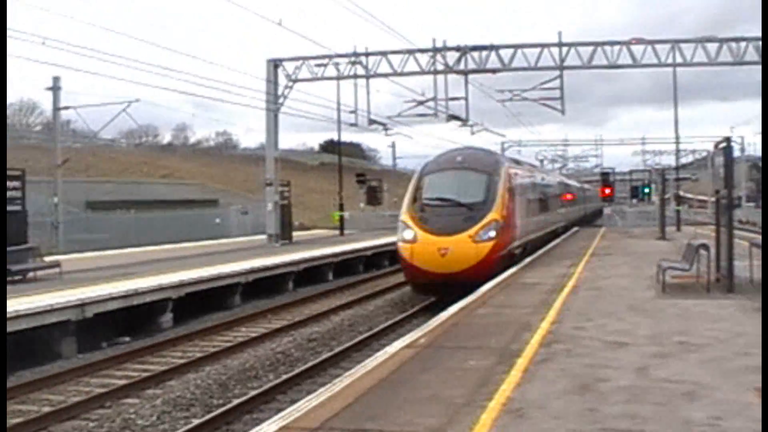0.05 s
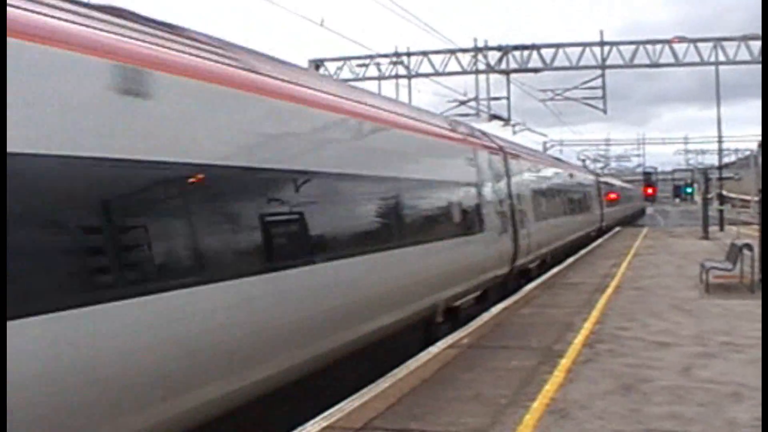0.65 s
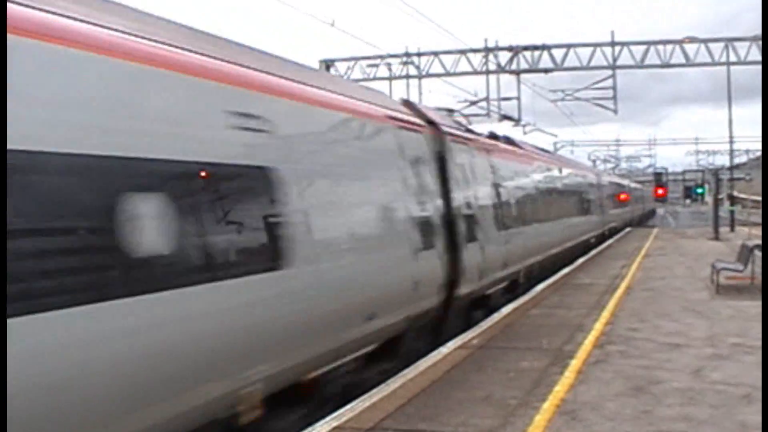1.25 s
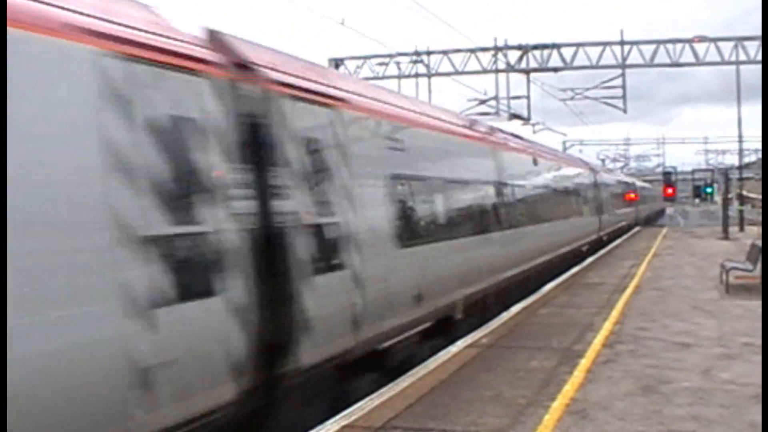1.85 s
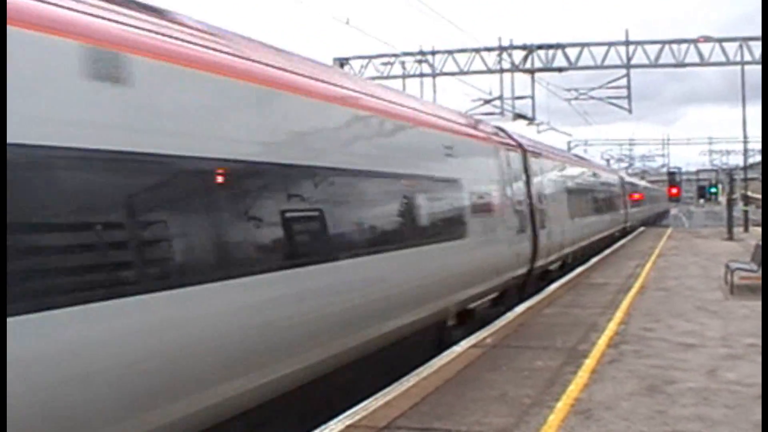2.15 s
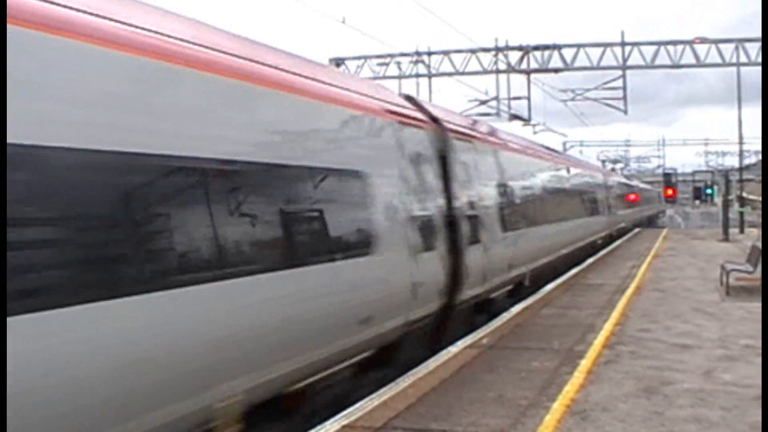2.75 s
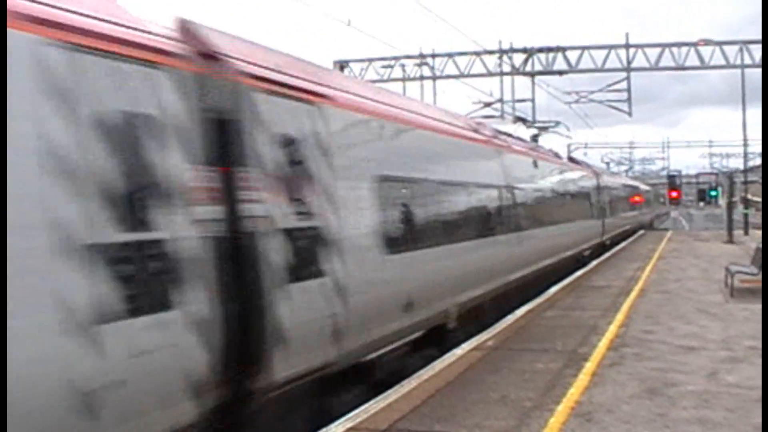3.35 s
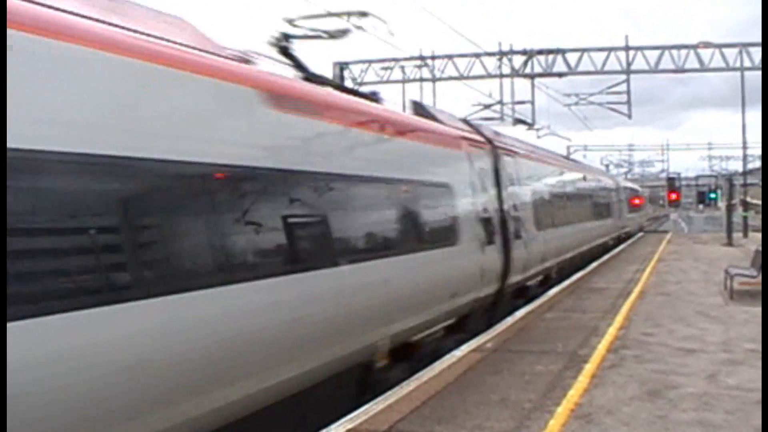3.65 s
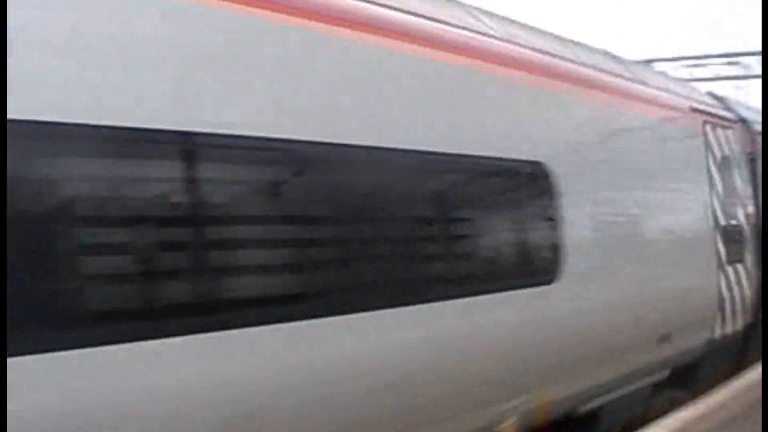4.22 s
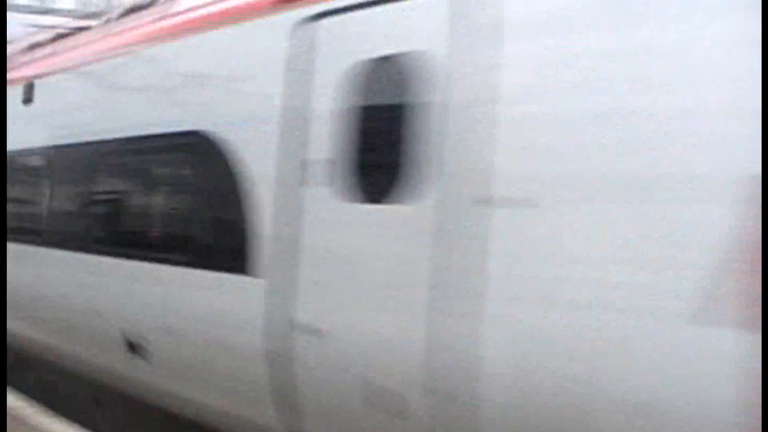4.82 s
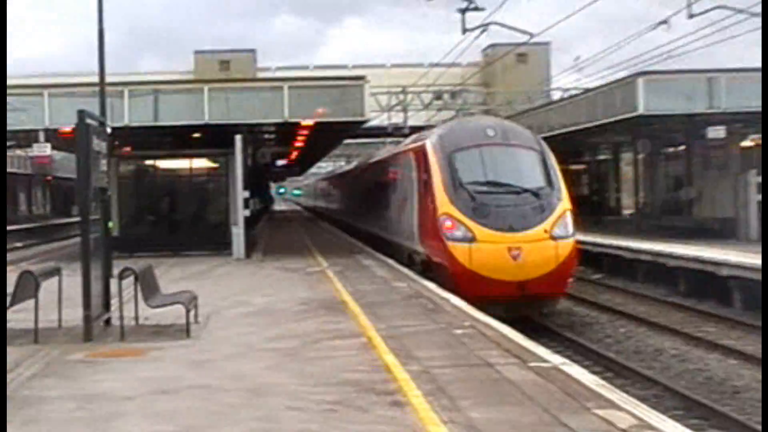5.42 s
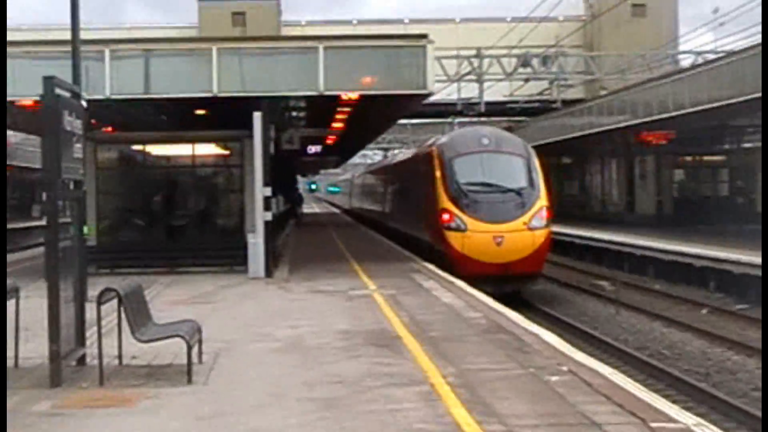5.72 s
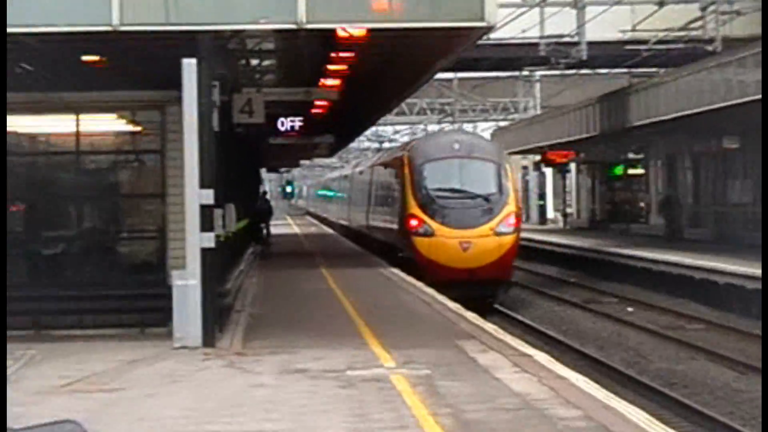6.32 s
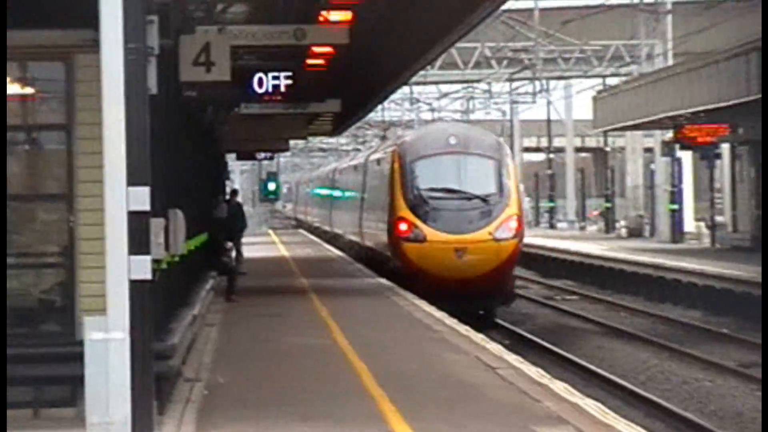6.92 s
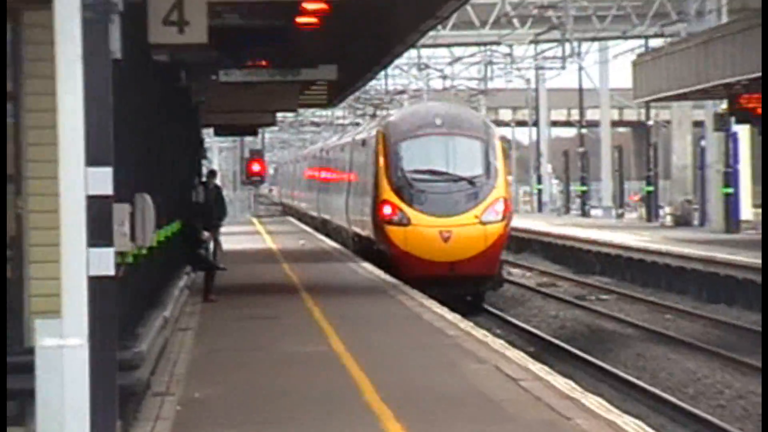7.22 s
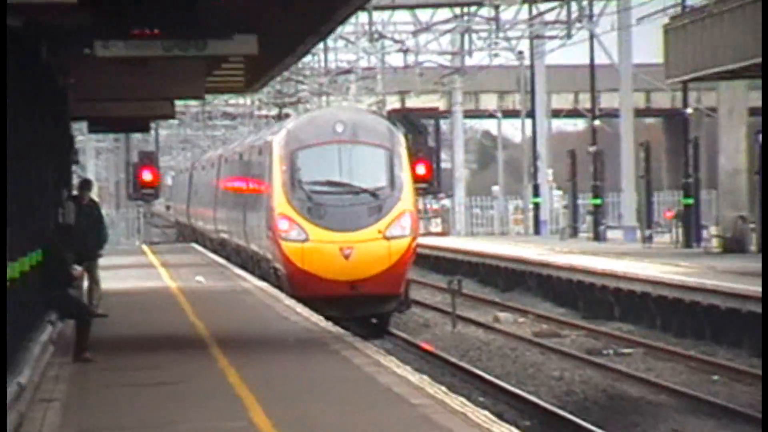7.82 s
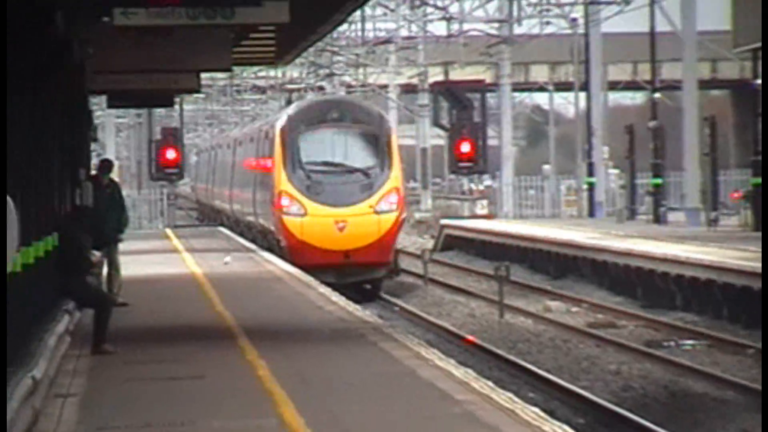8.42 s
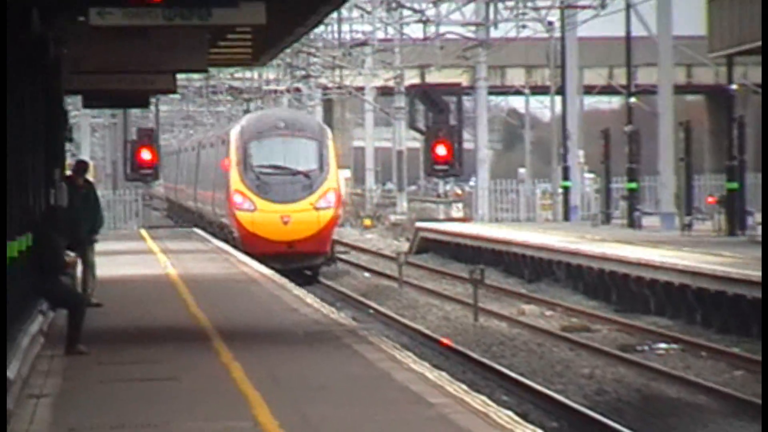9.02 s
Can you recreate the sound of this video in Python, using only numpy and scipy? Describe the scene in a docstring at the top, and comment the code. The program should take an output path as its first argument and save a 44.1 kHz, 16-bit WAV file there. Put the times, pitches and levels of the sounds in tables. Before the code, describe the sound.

Heard close from a station platform, a fast electric train arrives with a short drone and ringing rails. Carriage after carriage rushes past, steel wheels ringing and dropping in pitch amid a loud roar, pulsing hiss and dragged air. Once the tail has passed, the sound turns hollow beneath the platform roof and fades to distant wheel tones, with a few low gusts buffeting the microphone.

```python
"""A low drone and singing rails come first, then a nine-car electric train runs through the station at
speed, about four metres from a stereo microphone on the platform. Each bogie sweeps by with ringing steel
wheels whose pitch drops as they pass, over the roar of the rails and the rush of dragged air.
The train recedes under the canopy, which channels its sound back, while its wake buffets the microphone."""
import sys
import numpy as np
from scipy import signal
from scipy.fft import rfft, irfft, next_fast_len
from scipy.io import wavfile
from scipy.ndimage import map_coordinates

SR = 44100
rng = np.random.default_rng(int(sys.argv[2]) if len(sys.argv) > 2 else 0)


def dump(signal):
    """Clip the signal to [-1, 1] and save it as 16-bit WAV at the path in sys.argv[1]."""
    limited = np.clip(np.atleast_2d(signal).T, -1, 1)
    pcm = np.round(limited * 32767).astype(np.int16)
    wavfile.write(sys.argv[1], SR, pcm)


N = 404397


def amp(db):
    """Decibels to gain."""
    return 10 ** (np.asarray(db) / 20)

def unit(x):
    """Scale to rms 1."""
    return x / np.sqrt(np.mean(x ** 2) + 1e-20)

def clock():
    """The time of each sample in seconds."""
    return np.arange(N) / SR

def around(s, half_length):
    """The samples within half_length seconds of time s."""
    return slice(max(0, int((s - half_length) * SR)), int((s + half_length) * SR))

def along(points, hz):
    """(frequency, value) points read on a log axis."""
    f, v = np.transpose(points)
    return np.interp(np.log(hz + 1), np.log(f + 1), v)

def read_at(x, positions):
    """x at fractional sample positions; their pace bends the pitch."""
    return map_coordinates(x, [positions], prefilter=False, mode="mirror")

def wobble(rate):
    """A smooth random curve, rate knots a second."""
    coarse = np.arange(0, N + 64, 64) / SR
    knots = rng.standard_normal(4096)
    return np.interp(clock(), coarse, map_coordinates(knots, [coarse * rate], mode="mirror"))

def filtered(x, response):
    """x through a filter given as a function of frequency."""
    size = next_fast_len(N + 8192)
    return irfft(rfft(x, size) * response(np.fft.rfftfreq(size, 1 / SR)), size)[..., :N]

def noise_pair(spectrum):
    """Two noises of one colour: row 0 is shared by both microphone ports, row 1 sets them apart."""
    return unit(filtered(rng.standard_normal((2, N)), lambda hz: amp(along(spectrum, hz))))

def ringing(modes):
    """Resonances kept going by noise, as steel is by a rough rail."""
    def power(hz):
        return sum(amp(db) ** 2 / (1 + ((hz - f) / width) ** 2) ** 2 for f, width, db in modes)
    return unit(filtered(rng.standard_normal(N), lambda hz: np.sqrt(power(hz))))

def steady_ring(hz, width_hz, evenness=.27):
    """One resonance driven without a break: its chance swells and lulls are partly evened out."""
    ring = ringing([(hz, width_hz, 0)])
    envelope = np.hypot(ring, filtered(ring, lambda f: 1j))
    return unit(ring / (envelope + 1e-3) ** evenness)

def swell(s, length):
    """A bell-shaped rise and fall around time s."""
    return 1 / np.cosh(np.clip((clock() - s) / length, -20, 20)) ** 1.76

def sweep(s, before, after, rise, fall):
    """Power of something passing: half at s - before and s + after, with sides as steep as rise, fall."""
    t = clock() - s
    return 1 / (1 + np.where(t < 0, -t / before, t / after) ** np.where(t < 0, rise, fall))

def onset(s, length):
    """A smooth step from 0 to 1 around time s."""
    return (1 + np.tanh((clock() - s) / length)) / 2

def gone():
    """Share of the sound that reaches the microphone from behind the tail, 0 to 1."""
    return onset(5.21, .093)

def receded(canopy_end_s=6.87, fade_s=1.48):
    """How far the departing train has faded: 0 under the canopy, 1 far beyond it."""
    return np.clip((clock() - canopy_end_s) / fade_s, 0, 1)

def roof_lift():
    """A last swell in dB as the tail nears the end of the roof."""
    return 1.5 * swell(6.83, .075)


# The train far beyond the canopy: (frequency [Hz], width [Hz], relative level [dB])
DISTANT_MODES = [(160, 60, 0), (880, 110, -5.5), (1037, 100, -0.5), (1190, 75, -2), (1510, 20, -10),
                 (1960, 10, -9), (2010, 45, 0.5), (2460, 18, -11)]

def distant_howl(db=-36):
    """A thin howl is left once the tail is far down the line."""
    return amp(db) * onset(7.66, .15) * ringing(DISTANT_MODES)

def lingering_tone(db=-41):
    """A low wheel tone carries back to the platform as the rest fades."""
    return amp(db) * np.sqrt(sweep(7.85, .47, .47, 4.7, 14)) * steady_ring(hz=704, width_hz=20)

# Roar and hiss from far along the platform: (frequency [Hz], relative level [dB])
FAR_ROAR_SPECTRUM = [(800, -54), (1350, -7), (1620, -11.5), (1800, -1), (2050, 1.5), (2600, 2), (2900, -2),
                     (3500, -2.5), (4200, -11.5), (5500, -29.5), (9000, -72)]
FAR_HISS_SPECTRUM = [(2500, -20), (4000, 1.5), (5000, -2), (6300, -9), (8000, -25), (10300, -45),
                     (11600, -28.5), (13000, -37), (15600, -44)]
# Wheels heard from behind, lowered in pitch: (frequency [Hz], width [Hz], relative level [dB])
RECEDING_MODES = [(630, 40, -5), (705, 7, 0), (790, 60, -3), (910, 20, -7), (1552, 19, 1.5), (1922, 11, 3),
                  (2040, 60, -1.5), (2525, 30, -6)]

def canopy(roar_db=-24.5, hiss_db=-38.5, ring_db=-27.5):
    """The roof channels the departing roar and wheel tones to the microphone; the hiss fades fastest."""
    roar_gain = amp(roar_db + roof_lift() - 9.5 * receded() + .18 * wobble(24))
    out = roar_gain * noise_pair(FAR_ROAR_SPECTRUM)
    out += amp(hiss_db - 16 * receded() + .96 * wobble(15)) * noise_pair(FAR_HISS_SPECTRUM)
    # each tone swells and sinks by itself as the reflections shift
    tones = sum(amp(db + .8 * wobble(7)) * np.sqrt(width) * steady_ring(hz, width)
                for hz, width, db in RECEDING_MODES)
    audible = onset(4.5, .27) * (1 - onset(8.57, .27))
    out[0] += amp(ring_db + roof_lift() - 8 * receded()) * audible * unit(tones)
    return np.sqrt(gone()) * out

# The front of the train, heard from up the line: (frequency [Hz], width [Hz], relative level [dB])
NOSE_MODES = [(167, 28, -6), (200, 31, -3), (245, 23, -4), (550, 69, -12), (773, 110, -8.5),
              (1060, 110, -10.5), (1260, 180, -16), (1870, 250, -10.5)]

def nose_drone(db=-24.5):
    """The nose drones ahead of itself until it draws level with the microphone."""
    return amp(db) * np.sqrt(sweep(.48, .69, .22, 1.4, 7)) * ringing(NOSE_MODES)

# The rails below the platform, ahead of the nose: (frequency [Hz], width [Hz], relative level [dB])
RAIL_MODES = [(1965, 35, -6), (2510, 80, 0)]

def singing_rails(db=-29.5):
    """The rails carry the ring of the first wheels ahead, wavering and building until the nose arrives."""
    drift = np.cumsum(.02 * wobble(22))
    flicker_db = 2.5 * wobble(25)
    ring = read_at(ringing(RAIL_MODES), np.arange(N) + drift)
    return amp(db + flicker_db) * np.sqrt(sweep(.53, .14, .13, 2, 10)) * ring

# Eddies striking the microphone: (time [s], level [dB], length [s])
WAKE_EDDIES = [(6.038, -26.5, 0.064), (6.1, -18, 0.016), (6.267, -22, 0.0077), (7.893, -22.5, 0.012),
               (7.92, -23, 0.013), (7.995, -28, 0.024), (8.06, -35, .02), (8.146, -28.5, 0.028),
               (9.048, -32, 0.041)]

def wake(push_s=.00058, sharp_s=.013, leak_hz=65):
    """Each eddy behind the tail is a low flurry; the briefest also suck and push on the microphone."""
    flurry = noise_pair([(20, -9), (50, -2), (100, 0), (180, 1), (300, -10.5), (600, -22.5), (2000, -71)])
    out = sum(amp(db) * swell(s, length) for s, db, length in WAKE_EDDIES) * flurry
    for s, db, length in WAKE_EDDIES:
        u = np.clip((clock() - s) / push_s, -10, 10)
        out[0] += amp(db) * min(1, sharp_s / length) ** 2 * u * np.exp(-u ** 2 / 2)
    # the microphone lets the deepest part of the push leak away
    return signal.sosfilt(signal.butter(2, leak_hz, "high", fs=SR, output="sos"), out)

# Sharp edges passing the microphone: (time [s], half length [s], level [dB])
EDGE_PASSES = [(.45, .2, -52), (3.93, .07, -59), (4.39, .11, -49)]
# Their hiss at close range: (frequency [Hz], relative level [dB])
EDGE_SPECTRUM = [(4500, -25), (8000, -5), (10000, 1), (12000, -9), (14300, -13), (15600, -29)]

def edge_hiss():
    """Air tearing over the nose and the raised pantograph adds a brief, very bright hiss."""
    return sum(amp(db) * swell(s, length) for s, length, db in EDGE_PASSES) * noise_pair(EDGE_SPECTRUM)

# Blunt parts pushing air past the platform: (time [s], half length [s], rumble [dB], rush [dB])
AIR_GUSTS = [(.4, 0.44, -36.5, -34), (.66, .07, -32, -45), (1.417, .15, -31, -41), (2.44, 0.05, -32, -37),
             (4.124, 0.31, -40, -31.5), (4.965, 0.1, -38.5, -29.5)]
# Rumble, rush alongside and rush from down the platform: (frequency [Hz], relative level [dB])
RUMBLE_SPECTRUM = [(20, -42), (40, -18), (55, -17), (72, -2.5), (110, -1), (190, 0), (260, -1), (350, -8),
                   (550, -9.5), (1500, -69)]
RUSH_SPECTRUM = [(150, -41), (320, -6), (500, -3.5), (680, -4.5), (860, -1), (1080, -6), (1350, -8.5),
                 (1800, -9.5), (3500, -60)]
FAR_RUSH_SPECTRUM = [(200, -36), (370, -11.5), (520, 0.5), (700, 3), (900, 1.5), (1050, 2.5), (1300, -2),
                     (1700, 3), (3500, -56)]

def air(rumble_db=-34.5, bogie_db=-15, wake_db=-36, rush_db=-32, far_db=-27.5):
    """Turbulence rumbles around cars and bogies; body and track add a rush, hollow under the canopy."""
    rumble_power = amp(rumble_db) ** 2 + amp(wake_db) ** 2 * gone()
    rumble_power += amp(rolling_level() + bogie_db) ** 2 * (1 - gone())
    rush_power = amp(rush_db + .1 * (clock() - 2.26)) ** 2  # dragged air thickens along the train
    for s, length, gust_rumble_db, gust_rush_db in AIR_GUSTS:
        gust = sweep(s, length, length, 8, 8)
        rumble_power += amp(gust_rumble_db) ** 2 * gust
        rush_power += amp(gust_rush_db) ** 2 * gust
    rumble = np.sqrt(rumble_power) * amp(wobble(22) - 7 * receded()) * noise_pair(RUMBLE_SPECTRUM)
    near = np.sqrt(rush_power * (1 - gone())) * noise_pair(RUSH_SPECTRUM)
    far = np.sqrt(gone()) * amp(far_db + roof_lift() - 3.5 * receded()) * noise_pair(FAR_RUSH_SPECTRUM)
    return rumble + amp(1.44 * wobble(25)) * (near + far)

# Wheel groups drawing level with the microphone, one per car length:
# (time [s], rolling level [dB], hiss level [dB], sag [dB/s], heard before [s], heard after [s])
WHEEL_GROUPS = [(.62, -26.5, -37.5, -5, .2, .18), (1.08, -23.5, -39, 20, 0.15, 0.28),
                (1.59, -23, -38, 3, 0.25, 0.18), (2.065, -20.5, -38.5, 7, .14, 0.085),
                (2.57, -22, -37.5, 5, 0.16, 0.16), (3.05, -23, -40, 15, 0.15, 0.21),
                (3.55, -23, -37, 13, 0.19, 0.13), (4.04, -22.5, -37, 14, 0.18, 0.16),
                (4.56, -22, -35.5, 1, 0.25, 0.15), (5.02, -23.5, -54, -5, .18, 0.13)]

def rolling_level(bed_db=-23, ahead_db=-23.5):
    """Rolling noise in dB: a surge per group, most strongest at the front, and a roar before the nose."""
    surges = 0
    for s, db, _, sag, before, after in WHEEL_GROUPS:
        gain = amp(db - sag * np.clip(clock() - s, -.2, .2))
        surges += gain ** 2 * sweep(s, before, after, 10, 20)
    bed = amp(bed_db - 4 * onset(5.13, .015))  # the steady roll drops behind the last axle
    return 10 * np.log10(surges + bed ** 2 + amp(ahead_db) ** 2 * (1 - onset(.3, .19)))

def hiss_level(bed_db=-46, ahead_db=-37, lead_s=.12):
    """Hiss in dB: thrown forward, it peaks earlier and more briefly than the roll."""
    surges = sum(amp(db) ** 2 * sweep(s - lead_s, .069, .99 * after, 5, 2)
                 for s, _, db, _, _, after in WHEEL_GROUPS)
    return 10 * np.log10(surges + amp(bed_db) ** 2 + amp(ahead_db) ** 2 * (1 - onset(.53, .1)))

def bogies(gap_s=.135):
    """(time [s], level [dB]) of every bogie: nose, tail and a pair around each coupling."""
    nose, *couplings, tail = [(s, db) for s, db, *_ in WHEEL_GROUPS]
    return [nose] + [(s + side * gap_s / 2, db) for s, db in couplings for side in (-1, 1)] + [tail]

# Wheel on rail, a few metres from the microphone: (frequency [Hz], relative level [dB])
ROAR_SPECTRUM = [(700, -51), (1300, -49), (1600, -6.5), (1900, -2.5), (2300, 0.5), (2750, -1.5),
                 (3150, 0.5), (3600, -4), (4200, -10), (5200, -15.5), (8000, -54)]
HISS_SPECTRUM = [(2500, -11.5), (4000, 1.5), (4900, -2), (6300, -6.5), (8000, -11.5), (10000, -16),
                 (12000, -28.5), (14000, -43), (15600, -48)]

def rails(roar_db=-7, hiss_db=2.5, trail_db=-42):
    """The rails roar and hiss at a fixed pitch under each wheel group; the hiss trails after the train."""
    flutter = amp(1.16 * wobble(60))
    beside = np.sqrt(1 - gone())
    trail = np.sqrt(gone()) * amp(trail_db - 6 * np.maximum(clock() - 5.48, 0))
    roar = beside * amp(rolling_level() + roar_db) * noise_pair(ROAR_SPECTRUM)
    hiss = (beside * amp(hiss_level() + hiss_db) + trail) * flutter * noise_pair(HISS_SPECTRUM)
    return roar + hiss

# Single wheels and motors singing out, close by and then down the platform:
# (time [s], frequency [Hz], level [dB], length [s], fall [octaves/s])
SQUEAL_EVENTS = [(.691, 3020, -26.5, .04, 0.66), (.68, 2470, -28, .025, 1), (.763, 2270, -28, .035, 1.5),
                 (1.18, 3085, -31, .045, .8), (1.21, 2260, -34, .04, 1.3), (1.55, 3190, -27, .065, 1.3),
                 (1.688, 2860, -33, .05, 1), (1.85, 3300, -29, .05, 0.17), (2.076, 1813, -24.5, .02, .89),
                 (2.12, 2560, -23.5, .03, 1.2), (2.201, 900, -33, 0.068, 1.1), (2.43, 5780, -41, .04, 0.21),
                 (2.502, 3310, -30, .035, 1.5), (2.618, 2970, -33, .05, .91), (2.962, 2945, -18, .014, 1),
                 (3.05, 2930, -27, .04, 0.84), (3.17, 2250, -30, .065, 1.8), (3.521, 2910, -22.5, .045, 1),
                 (3.66, 2224, -28.5, .045, 1.9), (3.83, 3200, -27, .035, .15),
                 (4.148, 258, -27.5, .04, 0.09), (4.34, 522, -37, .067, 0.84), (4.482, 2900, -27, .04, 1.2),
                 (4.53, 2230, -26, .035, 1.5), (4.69, 2200, -28, .035, 1.7), (4.714, 2760, -24, .016, 1.06),
                 (4.933, 2980, -25, .04, 1.55), (5.021, 2273, -25, .04, 1.55),
                 (5.075, 2730, -26, .035, 1.5), (5.35, 2540, -23.5, .02, 0.22),
                 (6.726, 910, -29, .032, 0.36), (6.797, 1540, -32, .057, 0.14), (6.88, 749, -32.5, .14, .3),
                 (7.29, 714, -28, .025, .3), (7.335, 700, -19.5, .01, 0), (7.371, 2020, -30, .035, 0.084),
                 (7.402, 703, -29.5, .033, 0.03)]

def squeals(waver=.0064):
    """Now and then one resonance swells roughly above the rest, sliding down as the wheel goes past."""
    out, now = np.zeros(N), clock()
    unsteady = 1 + waver * wobble(170)
    for s, hz, db, length, fall in SQUEAL_EVENTS:
        near = around(s, 5 * length)
        t = now[near] - s
        cycles = np.cumsum(hz * unsteady[near] * 2 ** (-fall * np.clip(t, -.15, .15))) / SR
        # the ring loses its phase within some twenty cycles, sooner as it slides
        grit = [map_coordinates(knots, [cycles * (1 + fall) / 20], mode="mirror")
                for knots in rng.standard_normal((2, 512))]
        phase = 2 * np.pi * cycles
        ring = (1.6 / (1 + fall) + grit[0]) * np.sin(phase) + grit[1] * np.cos(phase)
        out[near] += amp(db) * unit(ring) / np.cosh(t / length) ** 1.7
    return out

# Wheels ringing up as they bear down on the microphone: (time [s], frequency [Hz], level [dB], length [s])
FLARE_EVENTS = [(.42, 2535, -26, .045), (0.546, 2630, -24, .032), (0.897, 2635, -23.5, .036),
                (1.017, 2570, -24, .045), (1.37, 2610, -26, .035), (1.469, 2560, -27, .035),
                (1.862, 2587, -24.5, .048), (1.98, 2500, -27, .04), (2.375, 2600, -26, .022),
                (2.445, 2495, -25, .035), (2.855, 2590, -20, .027), (3.327, 2610, -29, .035),
                (3.42, 2567, -25, .045), (3.923, 2545, -30, .05), (4.33, 2605, -30, .035),
                (4.412, 2560, -27, .045)]
# Weaker resonances that flare along: (frequency [Hz], width [Hz], relative level [dB])
FLARE_SIDE_MODES = [(1990, 45, 0), (3320, 55, -2)]

def wheel_flares(mode_hz=2590, octaves_per_s=.4, waver=.012):
    """A wheel rings up in a short wavering burst just before it arrives, already sinking in pitch."""
    ring = steady_ring(mode_hz, width_hz=85) + amp(-9) * ringing(FLARE_SIDE_MODES)
    out, now = np.zeros(N), clock()
    unsteady = 1 + waver * wobble(60)
    for s, hz, db, length in FLARE_EVENTS:
        near = around(s, 5 * length)
        t = now[near] - s
        pace = hz / mode_hz * unsteady[near] * 2 ** (-octaves_per_s * t)
        out[near] += amp(db) * read_at(ring, near.start + np.cumsum(pace)) / np.sqrt(1 + (t / length) ** 6)
    return out

# Wheel resonances at rest, those sent along the track and those the face sends toward the platform:
# (frequency [Hz], width [Hz], relative level [dB])
WHEEL_MODES = [(810, 60, -13), (1690, 36, -3), (2160, 45, -2), (2245, 42, -1), (2815, 45, -5)]
FACE_MODES = [(1900, 55, -5), (2480, 60, -2), (2900, 70, 0), (3130, 70, -1), (3480, 110, -5)]

def wheels(level_db=-2.5, distance_m=4.2, speed_m_s=49):
    """Every bogie carries its ring and roar past; the changing travel time bends their pitch down."""
    steel = unit(ringing(WHEEL_MODES) * amp(1.5 * wobble(35)))  # rough patches of rail make it flare
    roar = unit(noise_pair(ROAR_SPECTRUM)[0] + 1.1 * ringing(FACE_MODES))
    out, power = np.zeros(N), np.zeros(N)
    mach = speed_m_s / 343
    for s, db in bogies():
        start, wear = rng.uniform(0, 1, 2)
        near = around(s, 1)
        t = clock()[near] - s
        range_m = np.hypot(speed_m_s * t, distance_m)
        heading = speed_m_s * t / range_m  # -1 coming, +1 going
        emitted_s = (t - mach * range_m / speed_m_s) / (1 - mach ** 2)
        tuning = 1 + .01609 * (wear - .5)  # worn wheels ring a little higher
        positions = (emitted_s * tuning * SR + start * N) % (N - 1)
        in_view = np.cos(np.pi * t / 2) ** 2  # the cars hide the distant bogies
        gain = amp(db) * in_view * (distance_m / range_m) ** .52
        gain /= 1 + mach * heading  # motion throws the sound forward
        # the ring runs some metres ahead along the track, the broad roar comes out sideways
        ahead = np.minimum(heading, 0) ** 6
        ring_gain = gain * (.33 + 1.3 * ahead / (1 + (range_m / 12) ** 2))
        roar_gain = gain * (1 - .7 * ahead)
        out[near] += ring_gain * read_at(steel, positions) + roar_gain * read_at(roar, positions)
        power[near] += ring_gain ** 2 + roar_gain ** 2
    # the bogies share the rolling level, the nearest taking most of it
    level = np.sqrt(1 - gone()) * amp(rolling_level() + level_db + 1.2 * wobble(50))
    return level * out / np.sqrt(power + 1e-9)

# Likeness of the two microphone ports: (frequency [Hz], correlation [0 to 1])
PORT_LIKENESS = [(1000, .985), (1350, .94), (1700, .985), (3100, .98), (5000, .91), (7000, .77),
                 (9200, .76), (11200, .2)]
# Phase between them: (frequency [Hz], left lead [rad])
PORT_LEAD = [(60, .2), (300, -.07), (750, -.18), (1400, -.08), (2500, .33), (4400, .9), (6900, 1.9),
             (8100, 2.85), (11000, 3.4), (14000, 4.8)]
# Balance between them: (frequency [Hz], left minus right [dB])
PORT_BALANCE = [(60, 7.5), (200, 7), (380, 6.5), (700, 3.5), (1300, 1.3), (4400, 0), (7500, -1.5),
                (9500, 6), (11400, 10), (14000, 9)]

def microphone_ports(shared, unshared):
    """Left and right: alike in the bass, though louder on the left, and drifting apart in the treble."""
    def angle(hz):
        return np.arccos(along(PORT_LIKENESS, hz)) / 2
    def lean(hz):
        left = amp(along(PORT_BALANCE, hz) / 2) * np.exp(.5j * along(PORT_LEAD, hz))
        return np.array([left, 1 / left])
    mid = filtered(shared, lambda hz: np.cos(angle(hz)))
    side = filtered(unshared, lambda hz: np.sin(angle(hz)))
    return filtered(np.array([mid + side, mid - side]), lean)

def microphone_turn(pair, corner_hz=750):
    """As the microphone turns to follow the train, the bass leans further to the left."""
    bass = filtered(pair, lambda hz: 1 / (1 + (hz / corner_hz) ** 2))
    lean_db = -4 + 7 * swell(4.96, 2.8)
    return pair + bass * (amp(np.outer([.5, -.5], lean_db)) - 1)

def scene(floor_db=-75):
    """Train and wake as heard from the platform, over a faint even hiss."""
    shared, unshared = rails() + air() + edge_hiss() + canopy() + wake()
    shared = shared + wheels() + wheel_flares() + singing_rails() + squeals()
    shared += nose_drone() + distant_howl() + lingering_tone()
    pair = microphone_turn(microphone_ports(shared, unshared))
    return pair + amp(floor_db) * rng.standard_normal((2, N))

def record(dry):
    """The recorder keeps nothing above its band limit."""
    return filtered(dry, lambda hz: hz < 15600)


dry = scene()
out = record(dry)
dump(out)
```